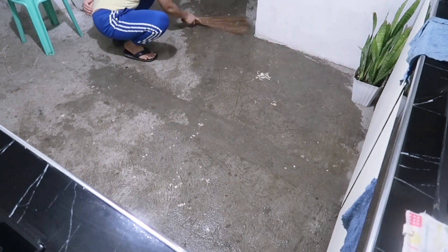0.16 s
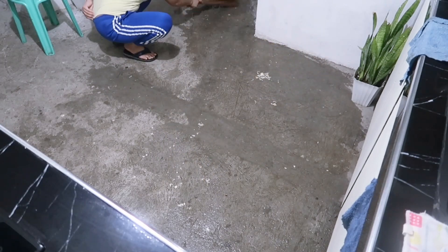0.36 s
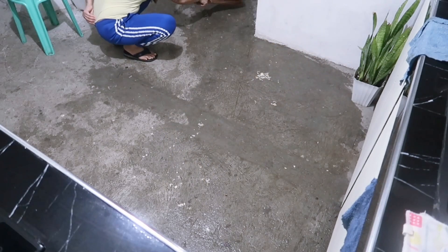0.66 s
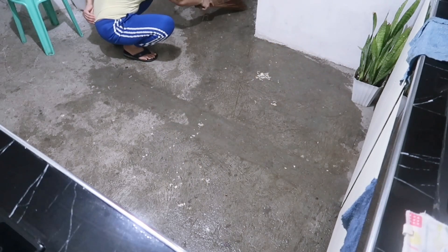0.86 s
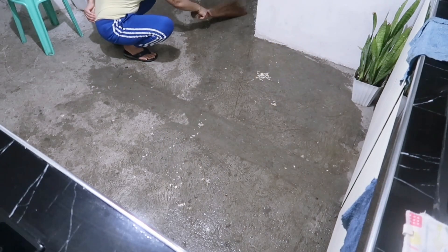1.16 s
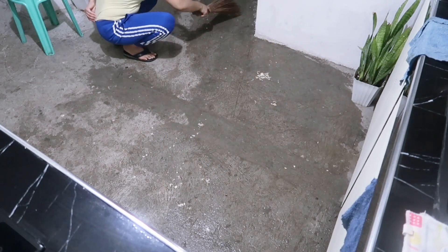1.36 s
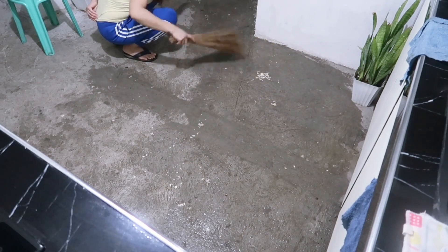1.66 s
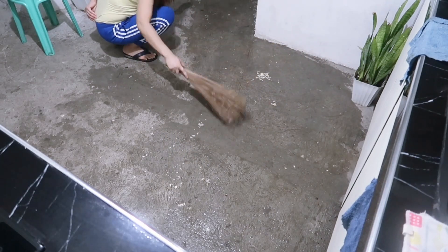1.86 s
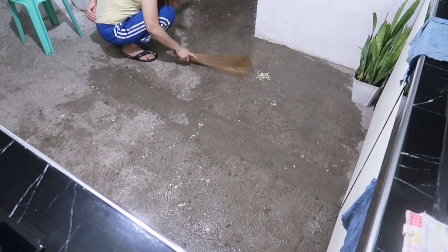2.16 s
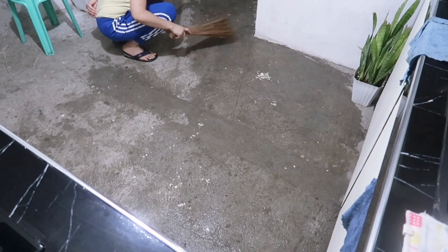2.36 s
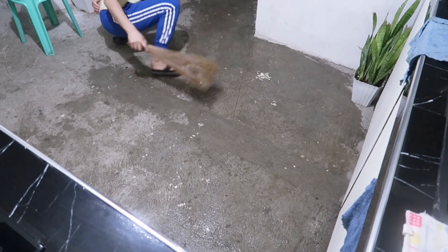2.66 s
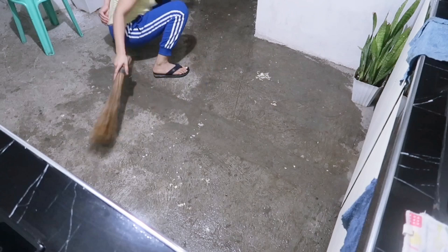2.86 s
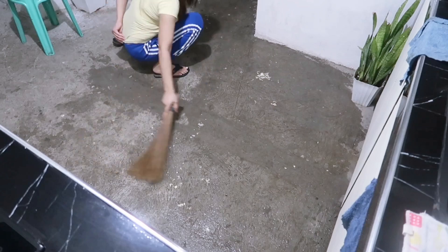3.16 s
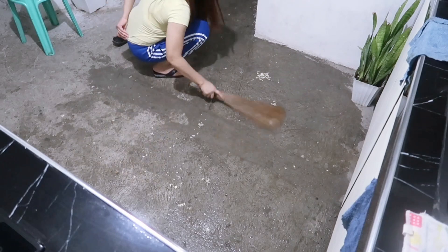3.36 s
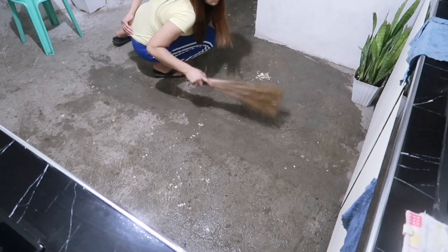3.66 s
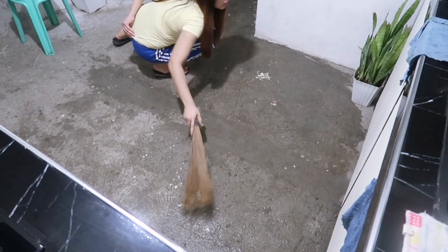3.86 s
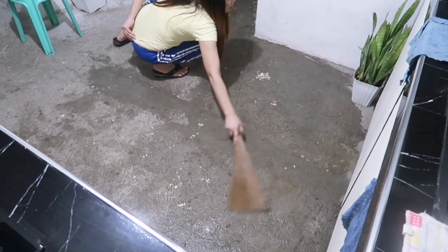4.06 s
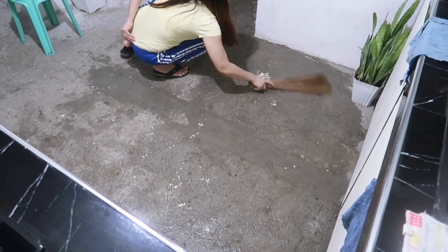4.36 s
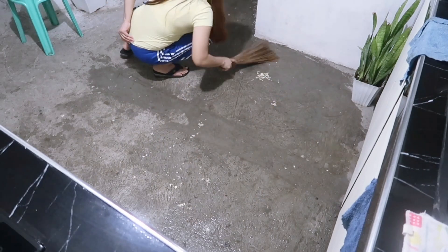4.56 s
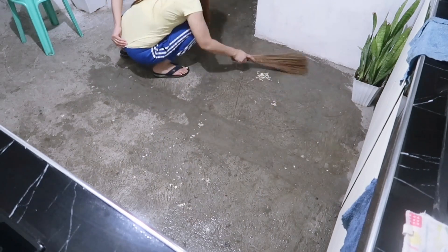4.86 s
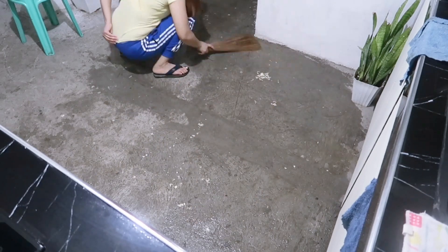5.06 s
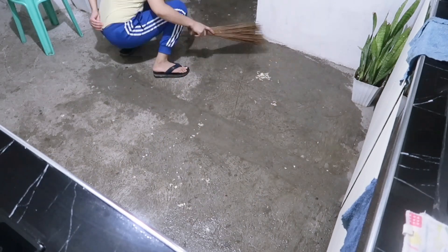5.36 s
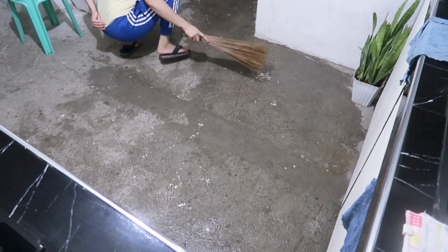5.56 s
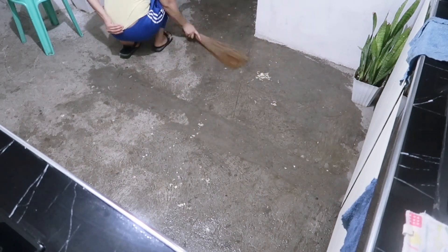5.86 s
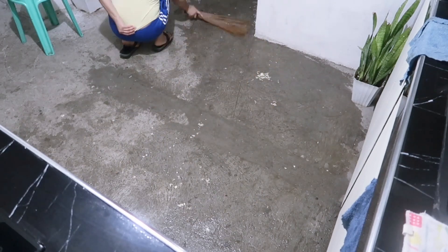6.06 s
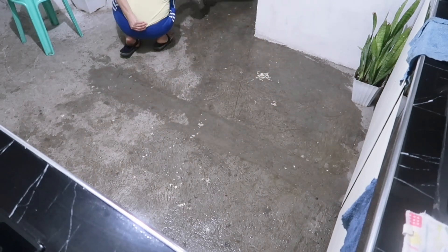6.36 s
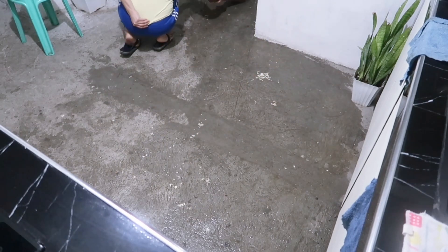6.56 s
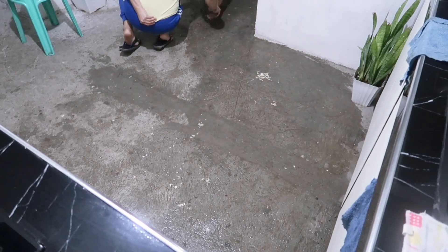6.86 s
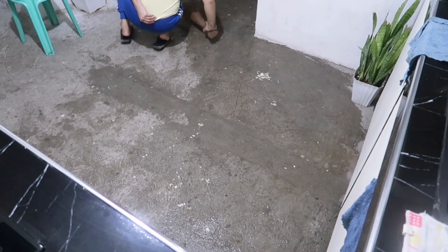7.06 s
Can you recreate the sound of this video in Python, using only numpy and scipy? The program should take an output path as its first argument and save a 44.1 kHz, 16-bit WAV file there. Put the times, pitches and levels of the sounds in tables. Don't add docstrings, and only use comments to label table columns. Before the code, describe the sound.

A stiff rib broom scrapes wet gritty concrete in uneven strokes and light dabs, echoing off hard walls over a faint motor hum.

```python
import sys
import numpy as np
from scipy import signal
from scipy.fft import rfft, irfft
from scipy.io import wavfile
from scipy.ndimage import uniform_filter1d

SR = 44100
rng = np.random.default_rng(int(sys.argv[2]) if len(sys.argv) > 2 else 0)


def waveform_to_disk(signal):
    frames = np.transpose(np.atleast_2d(signal))
    scaled = np.clip(frames, -1, 1) * 32767
    samples = np.round(scaled).astype(np.int16)
    wavfile.write(sys.argv[1], SR, samples)


def elevation(decibels):
    levels = np.asarray(decibels, float)
    return 10 ** (levels / 20)


N = 318402

# time in seconds, pressure in dB,
# tip speed from -1 (slow) to 1 (fast).
STROKES = [
    [(0.015, -24.5, .6), (0.05, -20.5, 0.76), (0.1, -14, 0.61), (0.24, -21.5, -0.75), (0.46, -25, -0.48),
     (0.6, -50.5, -1.2)],
    [(2.085, -36, 0.15), (2.18, -13, 0.83), (2.3, -20.5, 0.53), (2.33, -19, 0.72), (2.4, -33.5, 0.67),
     (2.52, -75, .6)],
    [(3.12, -69, -0.53), (3.2, -32.5, -0.21), (3.4, -15.5, 0.29), (3.55, -24, 0.44), (3.68, -48, 0.22)],
    [(4.02, -51, 0.033), (4.19, -17.5, 0.88), (4.26, -17, 0.54), (4.41, -20.5, 0.66), (4.5, -20, 0.65),
     (4.62, -20.5, -0.11), (4.82, -55, 0.29)],
    [(4.96, -54, 0.35), (5.02, -33, 0.6), (5.07, -15, 0.52), (5.19, -18, -0.23), (5.36, -46, 0.46)],
    [(5.8, -65, -0.62), (5.88, -38.5, -0.14), (5.97, -17.5, 0.78), (6.06, -16, .8), (6.2, -19, -0.54),
     (6.37, -20.5, -0.047), (6.52, -42, -0.021)],
    [(7.02, -39, -.3), (7.06, -31.5, 0.016), (7.16, -36.5, -0.15), (7.22, -44, -0.35)],
]
# rib bend in dB, wetness in dB.
STROKE_GRIP = [(1.5, -2.5), (0.5, -1.5), (6, 2), (1.5, -0.5), (-3.5, -3.5), (-3.5, -1.5), (7, -6.5)]
# start in seconds, peak in dB, length in seconds, tip speed, rib bend in dB.
DABS = [(0.709, -22.5, 0.07, -.1, -1), (0.906, -25.5, 0.08, -0.23, 5), (1.094, -23.5, 0.072, -0.28, -8),
        (1.286, -18.5, 0.068, 0.072, 8.5), (2.651, -33.5, 0.069, -1.86, -3),
        (2.746, -42.5, 0.046, -0.25, 4), (2.804, -39, 0.018, -1.6, 16), (2.809, -32, 0.046, -1.1, 14),
        (4.049, -40, 0.02, -0.59, 14), (5.824, -38.5, .03, -1.3, 5), (5.595, -42.5, 0.041, -1.53, 7),
        (6.6044, -22, 0.075, -0.15, 1), (6.811, -24.5, 0.096, 0.11, -5), (7.137, -23.5, 0.062, -0.64, 16)]
# start in seconds, peak in dB, length in seconds.
SURGES = [
    (4.433, -14.5, .035),
    (4.532, -20, 0.034),
    (5.032, -30, 0.024),
    (5.93, -27, 0.028),
    (6.296, -21, 0.035),
]
# frequency in Hz, level in dB per Hz.
SCRAPE_SPECTRUM = [(100, -107), (250, -15), (450, -25), (950, -15), (1800, -1), (3300, -0.5), (4500, -2.5),
                   (6400, -9), (9500, -23), (11500, -34), (13500, -37), (15600, -36)]
LAYER_HZ = (400, 950, 1800, 3200, 5600, 14000)
SPEED_DB = (-6.5, -7.5, 3)
SPEED_SQUARED_DB = (3.3, -2.5, -0.7)
# frequency in Hz, t60 in seconds.
WALL_DECAY = [(300, 0.57), (1000, 0.53), (3000, 0.54), (9000, 0.5)]
# time in seconds, shaft throb in dB, winding hum in dB.
MOTOR_LOAD = [(0.0, -53, -48), (0.24, -58, -65.5), (0.58, -58, -54), (0.84, -50.5, -60), (1.26, -55, -45.5),
              (1.57, -48, -54), (2.11, -43.5, -47.5), (2.27, -52, -63), (2.73, -48, -50.5),
              (3.5, -51.5, -59), (4.16, -55, -45), (4.85, -65, -62), (5.05, -66, -51.5), (5.51, -52, -62),
              (5.69, -48, -56.5), (6.56, -56, -67), (6.6, -55.5, -57.5), (7.22, -56, -52.5)]
# frequency in Hz, level in dB.
THROB_LINES = [(59.5, -2.5), (119, -7), (179, -13)]
# frequency in Hz, level in dB.
HUM_LINES = [(238, 3.5), (298, -8), (356, -5), (418, -7.5), (540, -7.5)]
# frequency in Hz, level in dB per Hz.
AIR_SPECTRUM = [(12, -51), (20, -33), (54, -2), (148, -13), (238, -12.5), (266, -16.5), (416, -12),
                (881, -18.5), (1630, -19.5), (1870, -21.5), (2090, -20.5), (2270, -18), (2610, -22),
                (10500, -53), (15500, -65.5)]
# frequency in Hz, level in dB.
HISS_SPECTRUM = [(1500, -110), (3500, -62.5), (7000, -78.5), (11000, -102), (15500, -101)]
# centre in seconds, half length in seconds, rise in dB.
TRAFFIC_SWELLS = [
    (2.8, 0.066, 6.5),
    (3.3, 0.13, 1.5),
    (4.33, 0.26, 7),
    (5.053, 0.034, 6),
    (5.86, .1, 1),
    (7.2, 0.16, 8),
]
# start in seconds, peak in dB.
SLAPS = [
    (2.746, -35),
    (2.825, -16.5),
    (2.848, -23),
    (2.884, -30),
    (2.912, -42),
    (4.045, -29),
    (4.44, -29),
]
# frequency in Hz, level in dB, t60 in seconds.
SOLE_MODES = [(275, -14, 0.046), (419, 15, 0.042), (530, -8, 0.045), (717, 4, 0.054), (920, -21, 0.038),
              (1260, -24, 0.093)]
# frequency in Hz, level in dB.
SIDE_LEVEL = [(30, -52), (60, -39), (120, -27), (220, -14.5), (400, -11.5), (800, -13.5), (1400, -17),
              (2500, -15.5), (4500, -4.5), (7000, 2.5), (9500, 8), (11500, 10), (13500, 13.5), (15600, -17)]
# frequency in Hz, difference in dB.
LEFT_LEAN = [(150, -17), (400, -0.8), (1500, -1), (5000, -1.5), (10000, 0.5)]

LAG_S = 2.2e-5
MIST_FADES_DB_PER_S = 16.5
SING_HZ, SING_OCTAVES_PER_SPEED, SING_WIDTH_OCTAVES, SING_DB = 2800, 0.67, 0.52, 1.5
RUMBLE_DB, AIR_DUCKS, HISS_DUCKS = -39.5, 0.39, 0.75
KNEE_DB, SQUEEZE, RECOVER_DB_PER_S, GRAB_S, GAIN_AT_START_DB = -27, 0.77, 10.5, 0.071, -31


def evened(x):
    return x / np.sqrt(np.mean(x ** 2) + 1e-20)


def evened_by(x, level_db):
    return np.sqrt(np.mean((x / elevation(level_db)) ** 2))


def read(points, hz):
    f, value = np.transpose(points)
    return np.interp(np.log(hz + 1), np.log(f + 1), value)


def add(mix, s, sound):
    part = mix[round(s * SR):][:len(sound)]
    part += sound[:len(part)]


def smooth_chance(shape, *spans):
    field = rng.standard_normal(shape)
    for axis, span in enumerate(spans):
        field = uniform_filter1d(field, span, axis)
        field = uniform_filter1d(field, span, axis)
    return evened(field)


def scratch(slips_per_s=5200, uneven_db=0.5, film=0.67, clump_db=0.5):
    sizes = elevation(uneven_db * np.minimum(rng.exponential(1, N), 5))
    slips = sizes * (rng.random(N) < slips_per_s / SR)
    slips *= rng.choice([-1., 1.], N)
    mix = evened(slips) + film * rng.standard_normal(N)
    return evened(mix * elevation(clump_db * smooth_chance(N, 200)))


def broom_colour(hz, t, patchy_db=1.5, mist=2.85):
    rows = []
    for stroke, (bend, wet) in zip(STROKES, STROKE_GRIP):
        rows += [(s, speed, bend, wet, s - stroke[0][0]) for s, _, speed in stroke]
    rows += [(s, speed, bend, 0, .15) for s, _, _, speed, bend in DABS]
    s, *grip = np.transpose(sorted(rows))
    speed, bend_db, wet_db, age_s = (np.interp(t, s, control) for control in grip)
    by_speed = np.outer(SPEED_DB, speed) + np.outer(SPEED_SQUARED_DB, speed ** 2)
    flex, drag, spray = by_speed + [bend_db, 0 * t, wet_db]
    mist_db = mist * spray + 2.63 - MIST_FADES_DB_PER_S * age_s
    moves_db = np.array([spray, flex, drag, 0 * t, spray, mist_db])
    layers = np.eye(len(LAYER_HZ))
    shares = np.array([np.interp(np.log(hz + 1), np.log(LAYER_HZ), one) for one in layers])
    octaves_off = np.log2((hz[:, None] + 1) / SING_HZ) - SING_OCTAVES_PER_SPEED * speed
    sing_db = SING_DB * np.exp(-(octaves_off / SING_WIDTH_OCTAVES) ** 2)
    patches = patchy_db * smooth_chance((len(hz), len(t)), 3, 8)
    return shares.T @ moves_db + sing_db + patches


def broom_pressure(settle_s=0.028, rise=0.3):
    pressure = np.zeros(N)
    for stroke in STROKES:
        s, level_db = np.transpose(stroke)[:2]
        stroke_db = np.interp(np.arange(s[0], s[-1], 1 / SR), s, level_db)
        settling = np.minimum(np.arange(len(stroke_db)) / (settle_s * SR), 1)
        add(pressure, s[0], elevation(stroke_db) * settling)
    for s, peak_db, length, *_ in DABS + SURGES:
        u = np.arange(0, .15, 1 / SR) / length
        landing = np.minimum(u / rise, 1) ** 3.2
        add(pressure, s - .008, elevation(peak_db - 5.5) * landing * np.exp(-u ** 2))
    return pressure


def broom():
    hz, t, z = signal.stft(scratch(), SR, nperseg=256, noverlap=192)
    shape = elevation(read(SCRAPE_SPECTRUM, hz))
    scrape_band = shape[(hz > 2400) & (hz < 4500)]
    shape /= np.linalg.norm(scrape_band) / np.sqrt(len(hz))
    coloured = z * shape[:, None] * elevation(broom_colour(hz, t))
    sound = signal.istft(coloured, SR, nperseg=256, noverlap=192)[1][:N]
    return sound * broom_pressure()


def walls(x, first_s, early_db, moves_per_s=4.3):
    taps = np.zeros((3, SR))
    at = np.arange(round(first_s * SR), SR - 20, 20)
    places = at + rng.integers(0, 20, (3, len(at)))
    np.put_along_axis(taps, places, rng.choice([-1., 1.], places.shape), 1)
    hz, t, z = signal.stft(taps, SR, nperseg=256)
    decay = elevation(-60 * t / read(WALL_DECAY, hz)[:, None])
    tail = signal.istft(z * decay, SR, nperseg=256)[1]
    tail *= elevation(early_db * np.exp(-np.arange(tail.shape[1]) / (0.0067 * SR)))
    cycles = moves_per_s * np.arange(N) / SR + np.arange(3)[:, None] / 3
    turns = np.cos(2 * np.pi * cycles) * np.sqrt(2 / 3)
    echoes = signal.fftconvolve(x * turns, tail / np.linalg.norm(tail[0]), axes=1)
    return echoes[:, :N].sum(0)


def gain_dip(x):
    climb = np.arange(N) * RECOVER_DB_PER_S / SR
    power_db = 10 * np.log10(abs(uniform_filter1d(x ** 2, size=2000)) + 1e-12)
    peak_db = np.maximum.accumulate(power_db + climb)
    held_db = np.maximum(peak_db, GAIN_AT_START_DB) - climb
    over_db = np.maximum(held_db - KNEE_DB, 0)
    keep = np.exp(-1 / (GRAB_S * SR))
    return -SQUEEZE * signal.lfilter([1 - keep], [1, -keep], over_db, zi=[keep * over_db[0]])[0]


def motor(lines, waver_db, drift):
    t = np.arange(N) / SR
    sway = [np.interp(t, np.arange(800) / 100, smooth_chance(800, 6)) for _ in range(len(lines) + 1)]
    clock = np.cumsum(1 + drift * sway[-1]) / SR
    total = np.zeros(N)
    for (hz, db), waver in zip(lines, sway):
        total += elevation(db + waver_db * waver) * np.sin(2 * np.pi * (hz * clock + rng.random()))
    return evened(total)


def yard(dip_db, patchy_db=2.2):
    hz = np.fft.rfftfreq(2048, 1 / SR)
    at = np.minimum(np.arange(N // 512 + 5) * 512, N - 1)
    a, b = rng.standard_normal((2, 2, len(hz), len(at)))
    airy = np.interp(np.log(hz + 1), np.log([300, 1500]), [0, 1])[:, None]
    swell_db = sum(db * np.exp(-((at / SR - s) / half) ** 2) for s, half, db in TRAFFIC_SWELLS)
    level_db = read(AIR_SPECTRUM, hz)[:, None] + (1 - airy) * swell_db
    level_db = level_db + (1 + airy * (AIR_DUCKS - 1)) * dip_db[at]
    level_db = level_db + patchy_db * smooth_chance(a[0].shape, 8, 4)
    fine = elevation(read(HISS_SPECTRUM, hz)[:, None] + 35.0 + HISS_DUCKS * dip_db[at])
    spectrum = (a + 1j * b) * np.hypot(elevation(level_db), fine)
    noise = signal.istft(spectrum, nperseg=2048, noverlap=1536)[1][:, :N]
    t = np.arange(N) / SR
    s, throb_db, hum_db = np.transpose(MOTOR_LOAD)
    throb = elevation(np.interp(t, s, throb_db) - 0.5) * motor(THROB_LINES, 2.4, 0.03)
    hum = elevation(np.interp(t, s, hum_db) + 2.0) * motor(HUM_LINES, 2.1, 0.0024)
    return elevation(RUMBLE_DB) * noise / evened_by(noise, dip_db) + throb + hum


def slipper(slap_s=0.0013):
    out, t = np.zeros(N), np.arange(6000) / SR
    ring = sum(elevation(db - 60 * t / t60) * np.sin(2 * np.pi * hz * t) for hz, db, t60 in SOLE_MODES)
    for s, peak_db in SLAPS:
        rough = np.diff(uniform_filter1d(rng.standard_normal(801), 16))
        slap = signal.oaconvolve(ring, rough * np.exp(-t[:800] / slap_s))
        add(out, s, elevation(peak_db) * slap / abs(slap).max())
    return out


def scene():
    near = broom() + slipper()
    mid, side = yard(gain_dip(near))
    mid = mid + elevation(-3.0) * near + elevation(-6.5) * walls(near, .004, 0.)
    side = side + elevation(-3.5) * walls(near, .0003, 14.6)
    hz = np.fft.rfftfreq(N, 1 / SR)
    lean_db = read(LEFT_LEAN, hz) * np.clip(hz / 200 - 1, 0, 1)
    delay = np.exp(-1j * np.pi * hz * LAG_S / (1 + (hz / 7000) ** 4))
    lean = elevation(lean_db / 2) * delay
    mid, side = rfft(mid), rfft(side) * elevation(read(SIDE_LEVEL, hz))
    return irfft(np.array([mid * lean + side, mid / lean - side]), N)


def band_limit(x):
    return signal.sosfilt(signal.butter(12, 15730, fs=SR, output="sos"), x)


def record(dry, ceiling=2.04):
    height = abs(dry).max(0) / ceiling + 1e-9
    limited = dry * np.tanh(height) / height
    return band_limit(limited)


dry = scene()
out = record(dry)
waveform_to_disk(out)
```